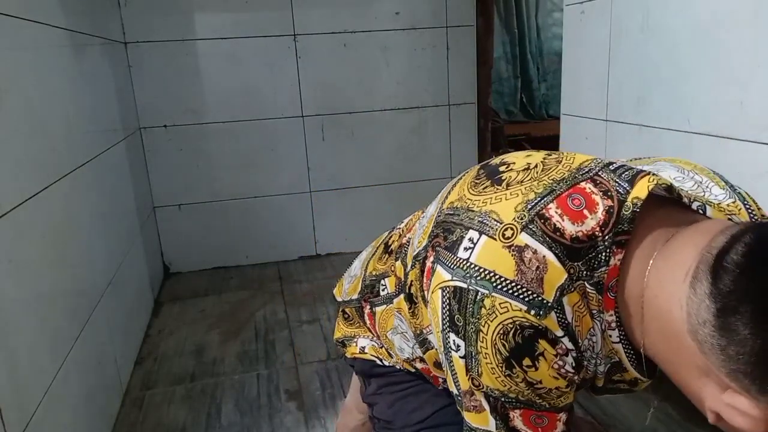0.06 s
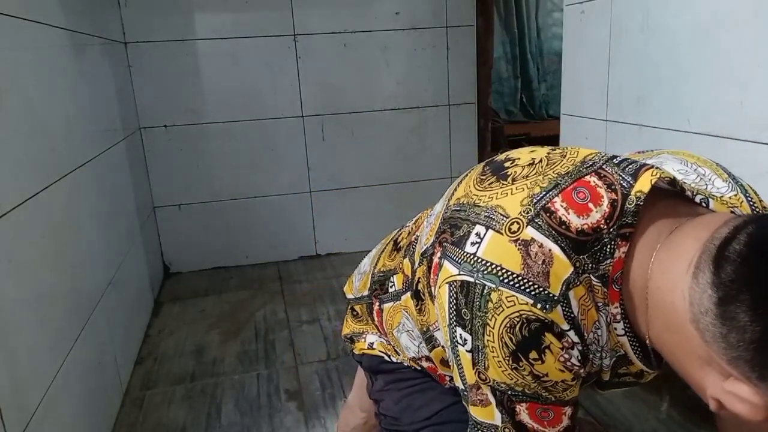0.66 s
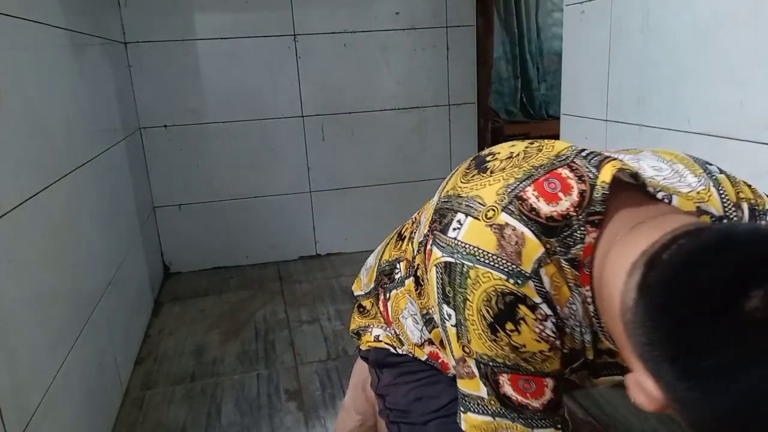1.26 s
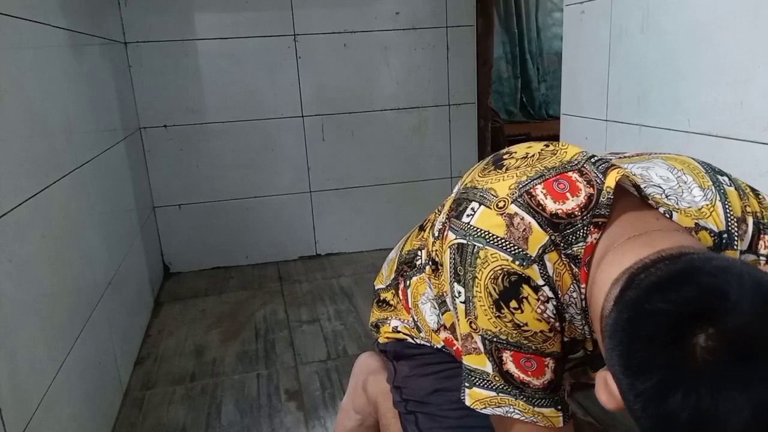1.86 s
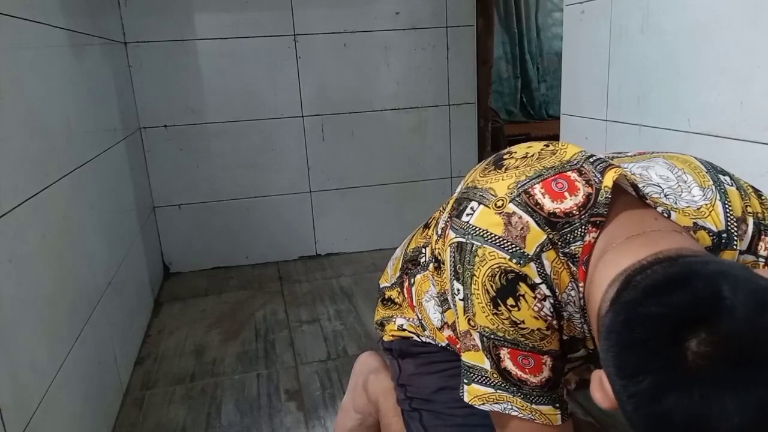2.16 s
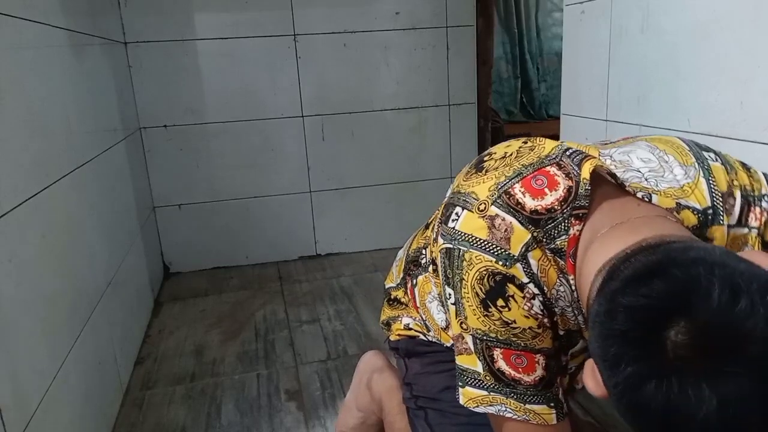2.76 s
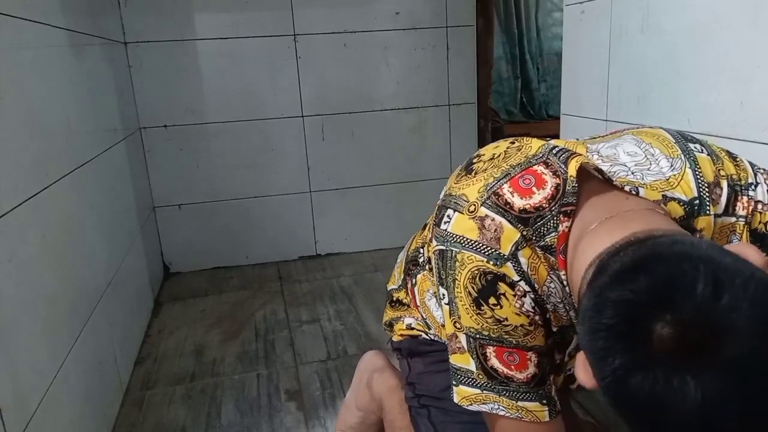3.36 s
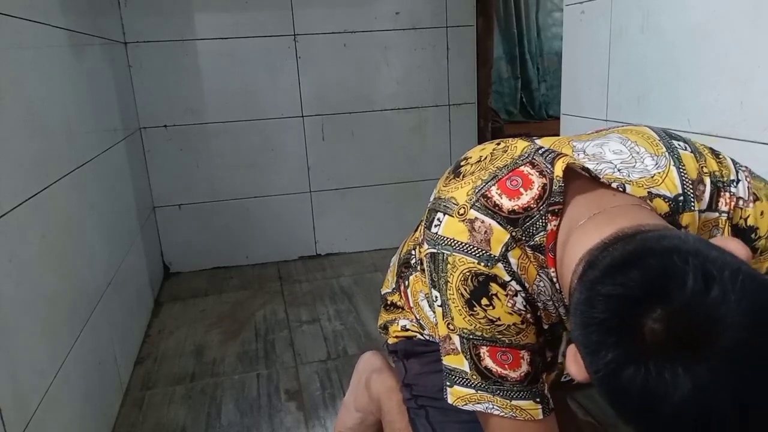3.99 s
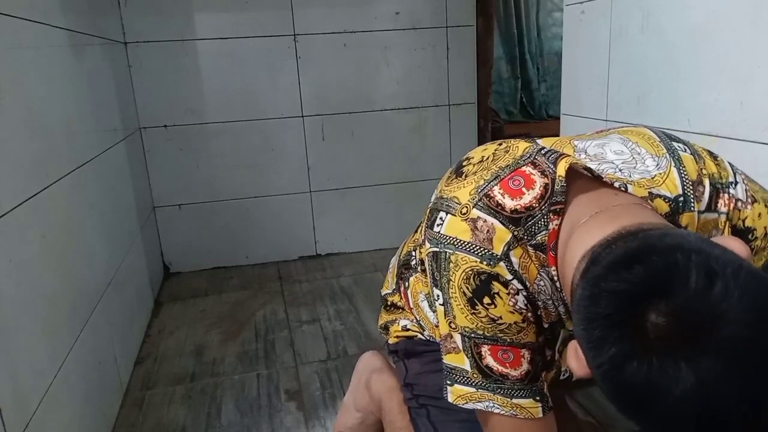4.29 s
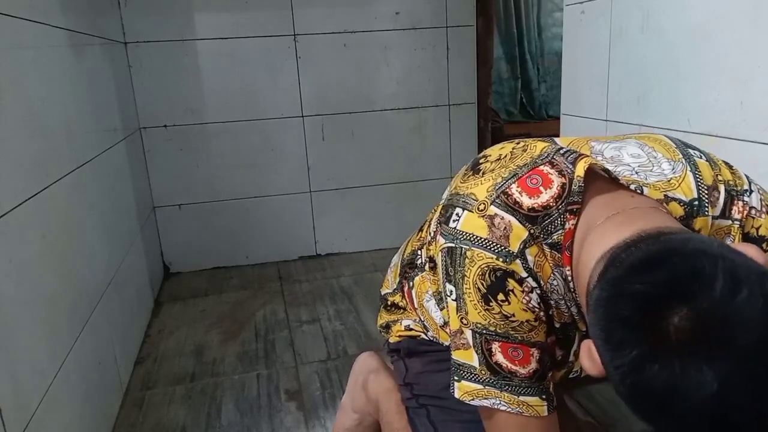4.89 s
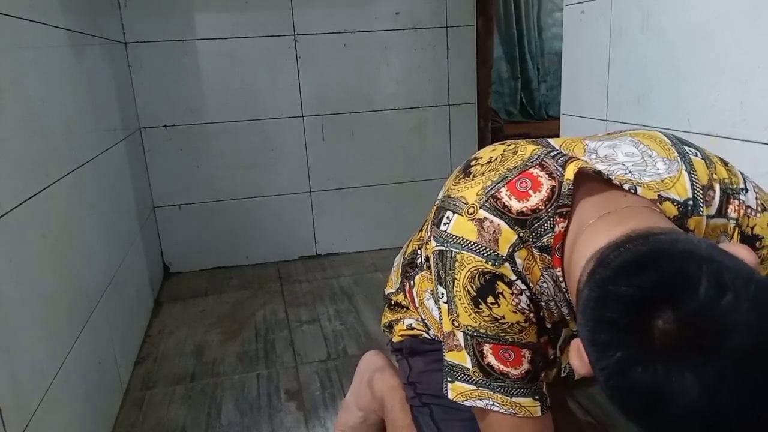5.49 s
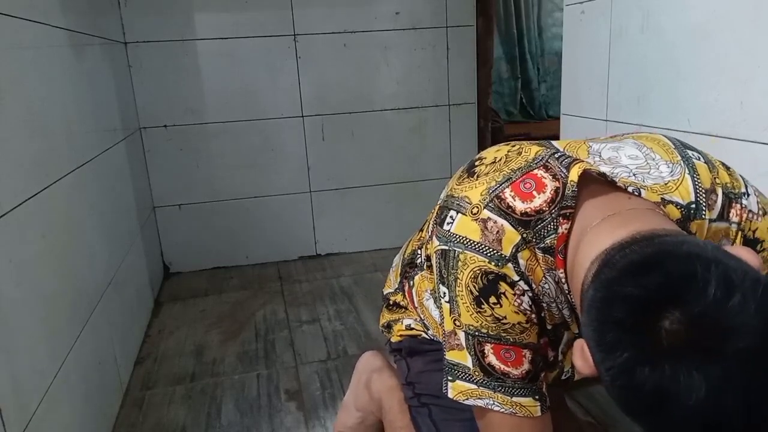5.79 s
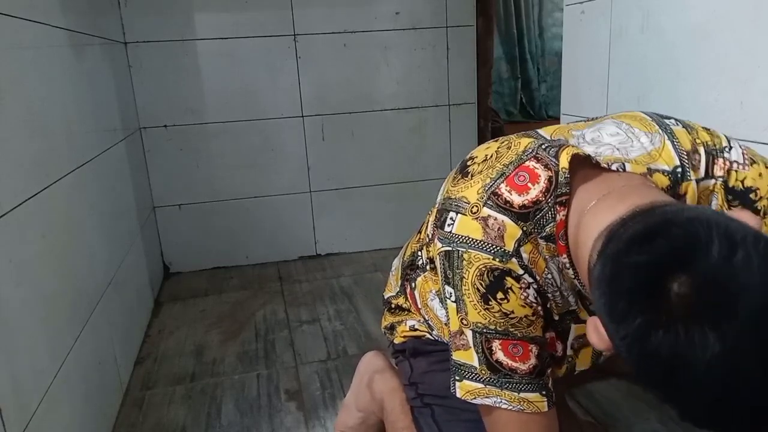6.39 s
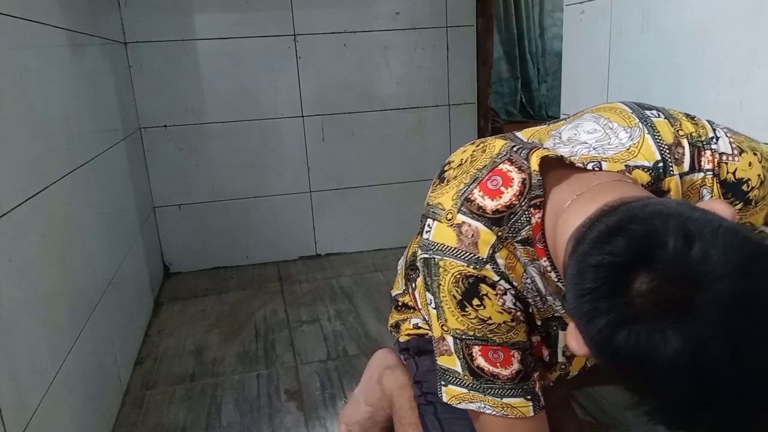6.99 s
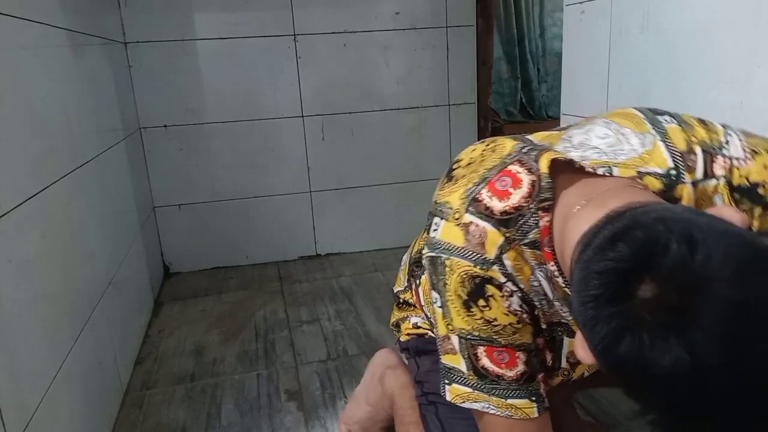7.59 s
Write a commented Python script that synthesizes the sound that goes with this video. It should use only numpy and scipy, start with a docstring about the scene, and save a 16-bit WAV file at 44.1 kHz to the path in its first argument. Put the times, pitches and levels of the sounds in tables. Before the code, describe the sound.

In a small tiled bathroom, a few light, squeaky scrapes give way to firm, rapid rasping as a plastic blade is shoved over dried cement on floor tiles. Sharp clicks of struck lumps, occasional soft thuds and brief squeals break up the strokes, crowding shortly before the last shove fades. The microphone is a little way off, so the hard walls ring after each stroke above a faint steady hiss and low hum.

```python
"""A small tiled bathroom, one microphone, far enough off to hear as much of the walls as of the tool.
A plastic scraper first skims dried cement on the ceramic floor, squealing as its edge sticks and slips.
From about 1.5 s it bears down, shoved back and forth: grains shake the blade, lumps crack against it,
the hand's weight thumps the tile, and short squeals return. The knocks crowd together near 6.7 s and
the last shove fades by 7.7 s. The hard walls ring after every stroke, over a faint hiss and hum."""
import sys
import numpy as np
from scipy import signal
from scipy.fft import rfft, irfft, next_fast_len
from scipy.io import wavfile
from scipy.ndimage import uniform_filter1d, minimum_filter1d, map_coordinates

SR = 44100
rng = np.random.default_rng(int(sys.argv[2]) if len(sys.argv) > 2 else 0)


def bounce(signal):
    """Save signal as a 16-bit WAV file at the path given by the first command-line argument."""
    frames = np.transpose(np.atleast_2d(signal))
    limited = np.clip(frames, -1, 1)
    pcm = np.round(limited * 32767).astype(np.int16)
    wavfile.write(sys.argv[1], SR, pcm)


N = 337365
T = np.arange(N) / SR
SIZE = next_fast_len(N + SR)
FREQ = np.fft.rfftfreq(SIZE, 1 / SR)


# Down at the floor, the colour of blade and tile under the grit: (frequency [Hz], gain [dB])
RASP_COLOUR = [(120, -19.5), (200, -16.5), (340, -20), (460, -8.5), (750, -3.5), (1000, -4), (1400, 1.5),
               (2050, 3), (3000, -2.5), (4200, -12.5), (6400, -25), (8400, -17), (10500, -34), (15000, -28)]
# How lightly the blade meets the floor: (time [s], skim [0 = bearing down, 1 = on its tip])
SKIMMING = [(0.2, 0.88), (0.48, 0.78), (0.8, 0.3), (1.1, 0.27), (1.45, 0.039), (7.6, 0.022)]
def scraping():
    """Coarse grains shake floor, blade and edge together; fine sand hisses and splits under the edge."""
    blade_gain, bite_gain, thrum_gain, hiss_gain = stroke_gains()
    catching = amp(2 * wobble(130)) * (1 + 1.13 * np.minimum(snags(rate=90, t60=0.012), 1))
    coarse = unit(catching * grit(rate=1800, spread_db=4, dust=0.3))
    splits = unit(snags(rate=45, t60=0.005) * rng.standard_normal(N))
    sand = unit(catching * grit(rate=3800, spread_db=1.5, dust=0.44))
    fine = 0.22 * coarse + sand + 0.37 * splits
    tip = unit(catching * grit(rate=2500, spread_db=6, dust=0.78))
    colour = amp(along(RASP_COLOUR, FREQ))
    skim = np.interp(T, *np.transpose(SKIMMING))

    def voice(grains, lo_hz, hi_hz):
        return unit(filtered(grains, causal(colour * band(lo_hz, hi_hz))))

    # skimming moves the tile less deeply and rings the short, stiff tip
    pressed, light = np.sqrt(1 - skim), np.sqrt(skim)
    floor = pressed * voice(coarse, 146, 802) + light * voice(tip, 565, 860)
    edge = pressed * voice(coarse, 2055, 4760) + light * voice(tip, 3480, 4730)
    thrum = amp(-2 + 3 * wobble(28)) * thrum_gain * floor
    blade = amp(-0.2) * blade_gain * voice(coarse, 932, 2120)
    bite = amp(0.5) * bite_gain * edge
    hiss = amp(0.86) * hiss_gain * voice(fine, 5660, 18000)
    crust_thickness = amp(0.31 * wobble(30))
    return crust_thickness * (thrum + blade + bite + hiss)


def grit(rate, spread_db, dust):
    """Tiny impacts of scattered size, rate a second, over the even rub of fine dust."""
    hits = (rng.random(N) < rate / SR) * rng.choice([-1, 1], N)
    sizes = amp(spread_db * np.clip(rng.standard_normal(N), -2, 2))
    return unit(unit(hits * sizes) + dust * rng.standard_normal(N))


def snags(rate, t60):
    """The edge catches at once and then works itself free."""
    starts = (rng.random(N) < rate / SR) * rng.uniform(0.29, 1, N)
    return signal.lfilter([1], [1, -amp(-60 / (t60 * SR))], starts)


# Shoves across the bathroom floor; bite, thrum and hiss are relative to the blade:
# (time [s], length [s], lead-in [s], crest [share of length], ring pitch [Hz],
#  blade level [dB], edge bite [dB], floor thrum [dB], sand hiss [dB])
SHOVES = [(-0.027, 0.081, 0.06, 0.2, 2770, -37, -6, -9, -13.5),
          (0.146, 0.19, 0.044, 0.23, 1300, -18.5, -4.0, -10, -5.5),
          (0.406, 0.086, 0.06, 0.19, 2050, -24.5, 1, -5, -15.5),
          (0.743, 0.13, 0.07, 0.39, 1330, -24, -0.5, -9.5, -8.5),
          (0.924, 0.15, 0.129, 0.5, 2010, -17.5, -3, -22.5, -9.5),
          (1.515, 0.11, 0.12, 0.79, 2580, -16, -0.5, -2, -23.5),
          (1.684, 0.064, 0.005, 0.85, 2120, -22.5, -3.5, -5.5, -12.5),
          (1.851, 0.11, 0.108, 0.36, 2290.0, -15, -3, -14.0, -19.5),
          (2.02, 0.08, 0.059, 0.61, 1440.0, -16.0, -2.5, -10.5, -16),
          (2.184, 0.11, 0.066, 0.92, 1415, -12.0, -3, -14, -20),
          (2.365, 0.13, 0.004, 0.77, 1500, -18.5, -1.5, -11, -15),
          (2.54, 0.17, 0.0034, 0.7, 2140, -13.5, -2.0, -13, -18),
          (3, 0.08, 0.33, 1, 1440, -31.5, -1.5, -9.5, -17),
          (3.102, 0.13, 0.11, 0.13, 1660, -20, 0.5, -12.5, -12.5),
          (3.293, 0.083, 0.023, 0.25, 2140, -22.5, -7.5, -13, -15.5),
          (3.487, 0.12, 0.24, 0.58, 2690.0, -22, 0, -14, -14),
          (3.663, 0.096, 0.029, 0.36, 2670, -19.5, -3.5, -25.0, -10),
          (3.851, 0.17, 0.146, 0.099, 1910, -22, -0.5, -18.5, -15),
          (4.066, 0.11, 0.06, 0.55, 1960.0, -21, -1.5, -14.5, -12.5),
          (4.264, 0.099, 0.069, 0.21, 2500, -19, 2.5, -14.5, -13.5),
          (4.445, 0.13, 0.14, 0.51, 2440, -22, -2, -13.5, -11.5),
          (4.635, 0.11, 0.061, 0.34, 1950, -17.0, -1.5, -20.5, -18.5),
          (4.84, 0.094, 0.029, 0.69, 1360, -20.5, -2.5, -12, -15),
          (5.012, 0.16, 0.048, 0.26, 1940, -22.5, -1.5, -14, -17),
          (5.228, 0.093, 0.073, 0.47, 1330, -23, -3.5, -17.5, -13.0),
          (5.37, 0.16, 0.0066, 1, 1900, -18, -2.5, -11.5, -16.5),
          (5.617, 0.096, 0.071, 0.22, 2220, -21.5, -4.5, -13.5, -13.5),
          (5.808, 0.093, 0.08, 1, 1160, -21, -2, -11.5, -16.5),
          (5.956, 0.093, 0.01, 0.7, 1570, -26.5, -3, -24, -11.5),
          (6.131, 0.095, 0.089, 1, 1230.0, -25.5, -1.5, -7, -14.5),
          (6.286, 0.066, 0.004, 0.56, 2280, -22, -3.5, -18.5, -16.5),
          (6.522, 0.03, 0.12, 0.4, 2150.0, -31, -5, -4.5, -12),
          (6.601, 0.045, 0.0034, 0.99, 1690, -19.5, 2.5, -6.5, -12.5),
          (6.692, 0.12, 0.004, 0.05, 1430, -23.5, -1, -15.5, -12),
          (6.869, 0.108, 0.088, 0.55, 1880, -30.5, 1.5, -11.5, -3.5),
          (7.059, 0.11, 0.12, 0.41, 1260.0, -24.5, 0.5, -14, -14),
          (7.25, 0.11, 0.0098, 0.78, 1770, -30, -4, -19, -8),
          (7.472, 0.032, 0.14, 0.8, 2530.0, -26.5, -4, -19.5, -17),
          (7.583, 0.056, 0.11, 0.94, 2560.0, -48, 4.5, 0.5, 3)]
def stroke_gains(thrum_fade_db=4.5):
    """Each shove drives blade, bite, thrum and hiss; the hand leans hardest at its start."""
    power = np.zeros((4, N))
    for s, length, lead_in, crest, _, db, bite_db, thrum_db, hiss_db in SHOVES:
        span, effort_db = effort(s, length, lead_in, crest)
        lean_db = thrum_fade_db * (0.5 - np.clip((T[span] - s) / length, 0, 1))
        level = db + effort_db
        power[:, span] += amp([level, level + bite_db, level + thrum_db + lean_db, level + hiss_db]) ** 2
    return np.sqrt(power)


def effort(s, length, lead_in, crest, rest_db=-44.5, start_db=-7.5, end_db=-5):
    """One shove's samples and dB re its crest: the edge engages, swells, sags and slides to rest."""
    release = min(0.18, 1.6 * length)  # a short jab stops sooner
    crest_s = np.clip(crest, 0.05, 0.95) * length
    corners = s + np.array([-lead_in, 0, crest_s, length, length + release])
    span = slice(*np.searchsorted(T, corners[[0, -1]]))
    return span, np.interp(T[span], corners, [rest_db, start_db, 0, end_db, rest_db])


def blade_ring(ring_db=-6, width_hz=150):
    """Grains keep the bent blade ringing through each shove, at a pitch set by grip and angle."""
    out = np.zeros(N)
    grains = filtered(grit(rate=830, spread_db=2, dust=0.3), causal(band(1010, 3480)))
    for s, length, lead_in, crest, hz, db, *_ in SHOVES:
        span, effort_db = effort(s, length, lead_in, crest)
        ring = signal.lfilter(*signal.iirpeak(hz, hz / width_hz, SR), grains[span])
        out[span] += amp(db + ring_db + effort_db) * unit(ring)
    return out


# Modes right at the struck blade: (frequency [multiple of ring pitch], level [dB], t60 [s])
BLADE_MODES = [(.66, 4, 0.01), (1, 20, 0.012), (1.28, -3, .007), (1.8, -25, .006)]
# Lumps struck on the floor: (time [s], level [dB], ring pitch [Hz], relative crack level [dB])
LUMPS = [(0.118, -35, 2530, -27), (1.448, -33.5, 2250, -21), (1.528, -22, 2320, -18),
         (1.871, -11.5, 1830, -21.5), (2.642, -15, 1860, -31), (2.979, -26, 1590, -39),
         (3.053, -21.5, 1740, -18), (3.112, -8, 2130, -20.5), (3.183, -18, 2360, -23),
         (3.309, -14, 2050, -40), (3.538, -17.5, 2770, -17), (3.8654, -11, 1910, -24),
         (3.928, -12, 2020, -16.5), (4.272, -17, 2130, -25), (4.291, -15, 1870, -27),
         (4.633, -18.5, 2060, -32), (5.889, -16.5, 1640, -25), (6.177, -24.5, 1390, -28),
         (6.21, -17, 1680, -18), (6.531, -25, 1860, -30), (6.603, -15.5, 2070, -30),
         (6.635, -12.5, 2880, -22), (6.654, -13, 1860, -34), (6.690, -10, 1530, -23),
         (6.698, -7.5, 1470, -20), (6.91, -15.5, 1870, -25), (7.074, -17, 2600, -14),
         (7.3264, -12.5, 1880, -38), (7.341, -21, 1690, -30), (7.4995, -11, 2510, -18.5)]
def knocks():
    """A lump stops the edge: the damped blade rings and chatters, cement crunches, a chip cracks off."""
    blows, cracks, t = np.zeros(N), np.zeros(N), np.arange(SR // 20) / SR
    colour = amp(along(RASP_COLOUR, FREQ))
    crumbs = unit(filtered(rng.standard_normal(N), colour * band(1030, 5950)))
    chips = unit(filtered(rng.standard_normal(N), colour * band(3930, 18000)))

    def burst(noise, t60):
        return noise[rng.integers(N - len(t)):][:len(t)] * amp(-60 * t / t60)

    def sized(x):  # to the energy of 6 ms at rms 1
        return x / np.linalg.norm(x) * np.sqrt(0.006 * SR)

    for s, db, hz, crack_db in LUMPS:
        phases = rng.uniform(0, 2 * np.pi, len(BLADE_MODES))
        ring = sum(amp(level - 60 * t / t60) * np.sin(2 * np.pi * hz * ratio * t + phase)
                   for (ratio, level, t60), phase in zip(BLADE_MODES, phases))
        chatter = ring.copy()
        add(chatter, rng.uniform(0.0012, 0.0028), 0.8 * ring)
        crunch = amp(1) * sized(burst(crumbs, t60=0.028))
        add(blows, s, amp(db) * sized(sized(chatter) + crunch))
        add(cracks, s, amp(db + crack_db) * sized(burst(chips, t60=0.062)))
    # the small, soft blade radiates neither bass nor top treble
    return amp(1.5) * filtered(blows, causal(band(1050, 4800))) + amp(6) * cracks


# The edge sticking on the floor: (time [s], length [s], pitch [Hz], width [Hz], level [dB])
STICK_SLIPS = [(0.139, 0.21, 3770, 450, -28), (.445, 0.084, 755, 99, -24.5),
               (0.718, 0.051, 5570, 500, -38.5), (0.802, .1, 1367, 130, -25), (1.55, 0.065, 2480, 220, -16),
               (3.181, 0.045, 1806, 300, -16.5), (3.758, 0.016, 13300, 1500, -24.5),
               (3.893, 0.044, 1950, 260, -23), (4.406, .025, 12100, 1800, -36),
               (4.826, 0.04, 8600, 1300, -30.5), (4.828, .03, 13500, 2000, -36),
               (5.266, .035, 2092, 300, -19), (6.306, .035, 2168, 296, -22.5), (6.686, .04, 1481, 280, -15),
               (6.748, .03, 14200, 1428, -35), (6.918, .045, 14300, 1640, -26.5),
               (6.923, .045, 6700, 800, -24.5), (7.334, .02, 1762, 298, -17.5),
               (7.501, 0.031, 3150, 300, -26.5), (7.491, .02, 4620, 250, -29.5)]
def squeals():
    """Stick and slip locks briefly onto one narrow resonance."""
    out = np.zeros(N)
    for s, length, hz, width_hz, db in STICK_SLIPS:
        t = np.arange(int(length * SR)) / SR
        pole = np.exp(-2 * np.pi * width_hz / SR)
        noise = rng.standard_normal((2, SR // 2))
        flutter = signal.lfilter([1], np.poly([pole, pole]), noise)[:, -len(t):]
        phase = 2 * np.pi * hz * t
        tone = unit(flutter[0] * np.cos(phase) + flutter[1] * np.sin(phase))
        add(out, s, amp(db) * np.sin(np.pi * t / length) * tone)
    return out


# Thumps in the tile under the hand: (time [s], pitch [Hz], level [dB])
TILE_THUMPS = [(1.902, 215, -35), (2.2, 220, -30), (3.185, 236, -19.5), (4.336, 199, -38),
               (4.672, 208, -28.5), (5.378, 605, -14), (5.88, 250, -35), (6.648, 333, -31)]
def thumps(rise_s=0.0081, t60=0.18):
    """The hand's weight sets off a dull, rough, quickly damped shudder of the tile."""
    out, t = np.zeros(N), np.arange(SR // 6) / SR
    for s, hz, db in TILE_THUMPS:
        tile = signal.butter(3, [0.7 * hz, 1.6 * hz], 'band', fs=SR, output='sos')
        shudder = unit(signal.sosfilt(tile, rng.standard_normal(len(t))))
        envelope = amp(db - 6.5 - 60 * t / t60) * (1 - np.exp(-t / rise_s))
        add(out, s, envelope * shudder)
    return out


# Decay of the small tiled room around the microphone: (frequency [Hz], t60 [s])
ROOM_DECAY = [(150, 0.34), (500, 0.36), (1400, 0.42), (3700, 0.41), (9700, 0.32), (15000, 0.28)]
def wall_tails(count, build_s):
    """Different echoes of the tiled walls, each of energy 1, building up briefly and dying away."""
    noise = rng.standard_normal((count, SR // 2), dtype=np.float32)
    hz, t, spectra = signal.stft(noise, SR, nperseg=256)
    decay = amp(-60 * t / along(ROOM_DECAY, hz)[:, None]).astype(np.float32)
    tails = signal.istft(spectra * decay, SR, nperseg=256)[1]
    tails *= np.clip(np.arange(tails.shape[1]) / SR / build_s, 0, 1) ** 2
    return tails / np.linalg.norm(tails, axis=1, keepdims=True)


# Standing waves between the walls, at the microphone: (frequency [Hz], width [Hz], level [dB])
ROOM_MODES = [(137.4, 4.4, 8.5), (223.7, 5.2, 10.5), (473, 12, -3.5), (600, 10, -14), (885, 12, -13),
              (1490, 23, -9)]
def bathroom(x, block=3072):
    """The walls' echo changes as the scraper moves; long waves keep part of their pattern."""
    still_tail, *tails = wall_tails(count=22, build_s=0.0047)
    window = signal.windows.cosine(block)
    moving = np.zeros(N)
    for k, start in enumerate(range(0, N, block // 2)):
        piece = x[start:start + block]
        add(moving, start / SR, signal.fftconvolve(piece * window[:len(piece)], tails[k % len(tails)]))
    still = signal.fftconvolve(x, still_tail)[:N]
    still_share = 0.29 / (1 + (FREQ / 2500) ** 2)
    echo = filtered(moving, np.sqrt(1 - still_share)) + filtered(still, np.sqrt(still_share))
    return filtered(echo, 1 + sum(amp(db) * resonance(hz, width) for hz, width, db in ROOM_MODES))


# Colour of the hiss at the microphone: (frequency [Hz], gain [dB])
HISS_COLOUR = [(25, -18), (48, -24), (68, -1), (95, 1.5), (125, -2), (250, 2), (500, 1.5), (1000, -18),
               (2400, 2), (3600, -2), (6000, -23), (10500, -13), (11500, -28)]
# Low tones far beneath the scraping: (frequency [Hz], level [dB])
HUM_TONES = [(71, -61), (92, -63.5)]
def room_tone():
    """Faint steady hiss with a low wavering hum."""
    hiss = amp(-51) * unit(filtered(rng.standard_normal(N), amp(along(HISS_COLOUR, FREQ))))
    hum = sum(amp(db + 2.6 * wobble(4.16)) * np.sin(2 * np.pi * hz * T + 3.3 * wobble(15))
              for hz, db in HUM_TONES)
    return hiss + hum


def amp(db):
    """Decibels as amplitude."""
    return 10 ** (np.asarray(db) / 20)


def unit(x):
    """x at rms 1."""
    return x / np.sqrt(np.mean(x ** 2) + 1e-20)


def along(points, hz):
    """(Hz, value) points interpolated on a log axis."""
    knots_hz, values = np.transpose(points)
    return np.interp(np.log(hz + 1), np.log(knots_hz + 1), values)


def wobble(rate):
    """A smooth random curve, rate knots a second."""
    return map_coordinates(rng.standard_normal(int(N * rate / SR) + 4), [T * rate])


def filtered(x, response):
    """x through a response on the frequency grid."""
    return irfft(rfft(x, SIZE) * response, SIZE)[:N]


def causal(gain):
    """The response with this gain that rings only after a blow."""
    cepstrum = irfft(np.log(np.maximum(gain, 1e-6)), SIZE)
    cepstrum[1:SIZE // 2] *= 2
    cepstrum[SIZE // 2 + 1:] = 0
    return np.exp(rfft(cepstrum))


def resonance(hz, width_hz):
    """Response of one damped mode."""
    return 1j * FREQ * width_hz / (hz * hz - FREQ ** 2 + 1j * FREQ * width_hz)


def band(lo_hz, hi_hz, order=10):
    """Gain of a band with steep skirts."""
    return np.sqrt((1 - 1 / (1 + (FREQ / lo_hz) ** order)) / (1 + (FREQ / hi_hz) ** order))


def add(track, s, sound):
    """Mix a sound into the track at time s."""
    part = track[max(0, round(s * SR)):][:len(sound)]
    part += sound[:len(part)]


def scene():
    """At the microphone: the tool on the floor, its echo from the walls and the quiet of the room."""
    tool = scraping() + blade_ring() + knocks() + thumps() + squeals()
    return (amp(-3.5) * tool + amp(-2.5) * bathroom(tool) + room_tone())[None]


def record(dry, ceiling=0.88, hold_samples=221, top_hz=15650):
    """A phone in the room: its limiter holds down the tallest peaks; nothing above top_hz is kept."""
    needed = ceiling / np.maximum(np.abs(dry[0]), ceiling)
    gain = uniform_filter1d(minimum_filter1d(needed, hold_samples), hold_samples)
    return filtered(dry[0] * gain, FREQ < top_hz)[None]


dry = scene()
out = record(dry)
bounce(out)
```